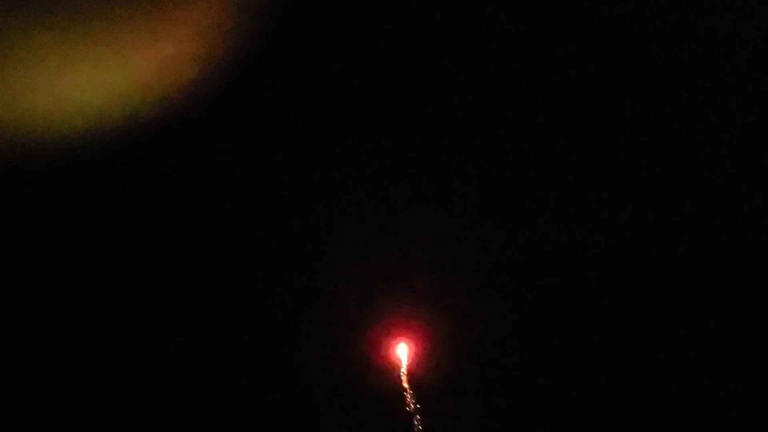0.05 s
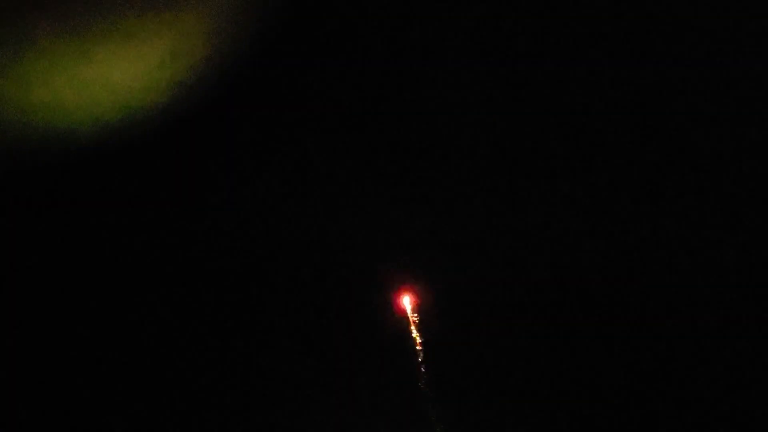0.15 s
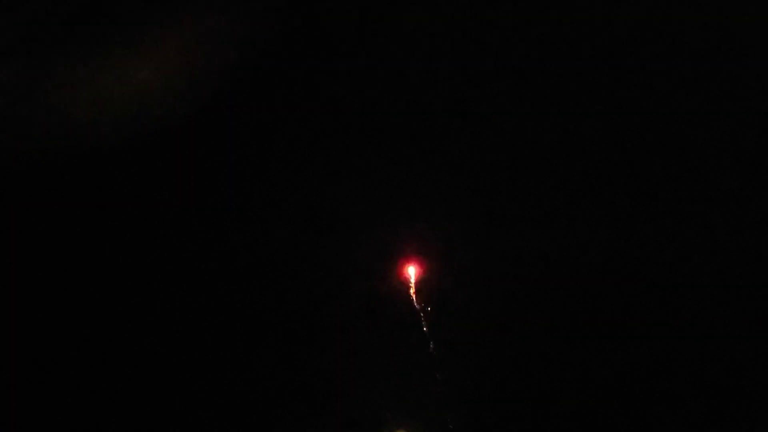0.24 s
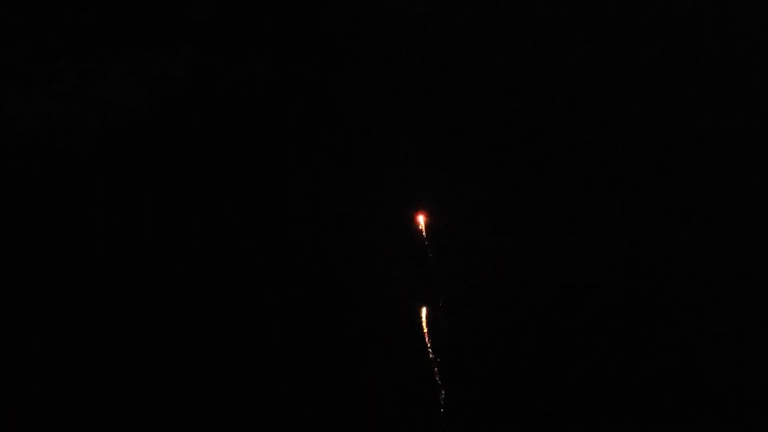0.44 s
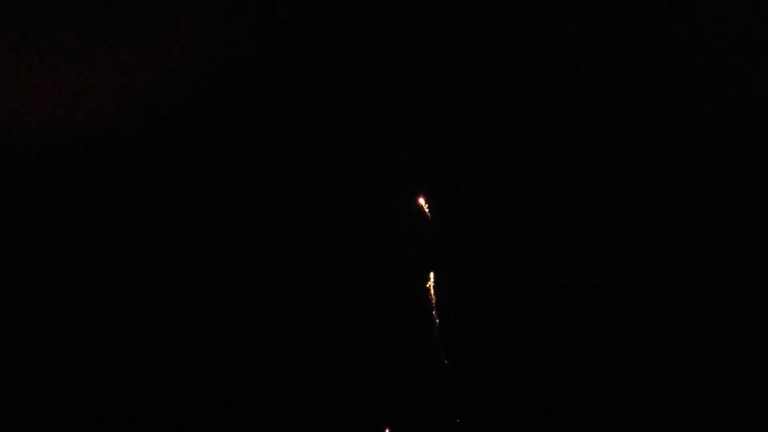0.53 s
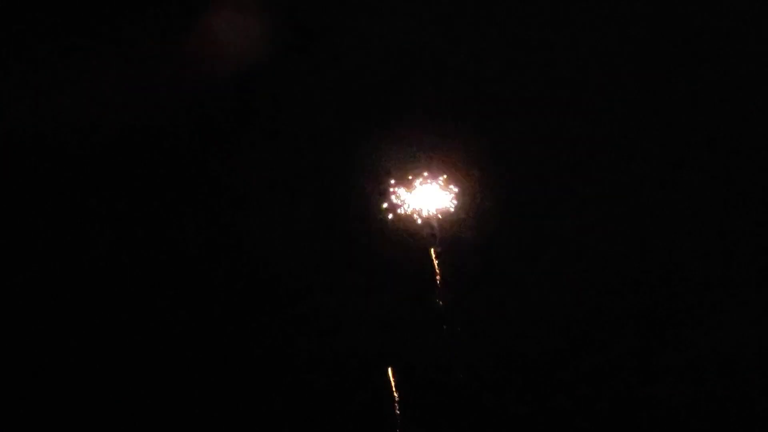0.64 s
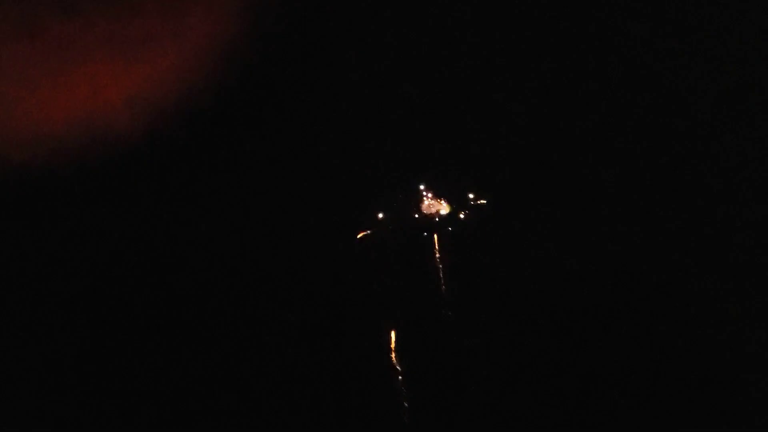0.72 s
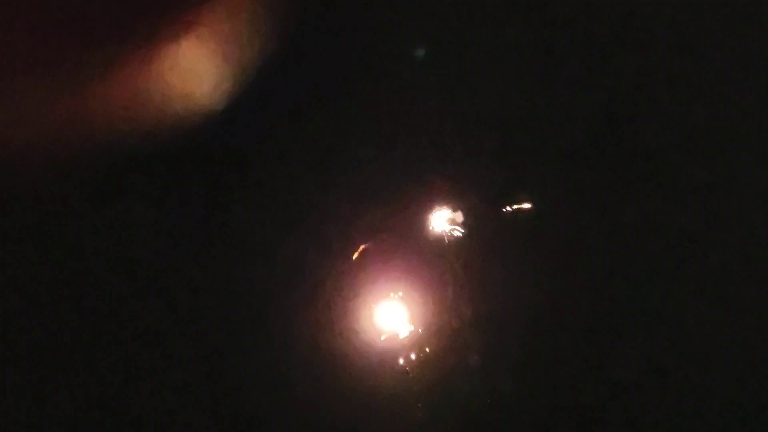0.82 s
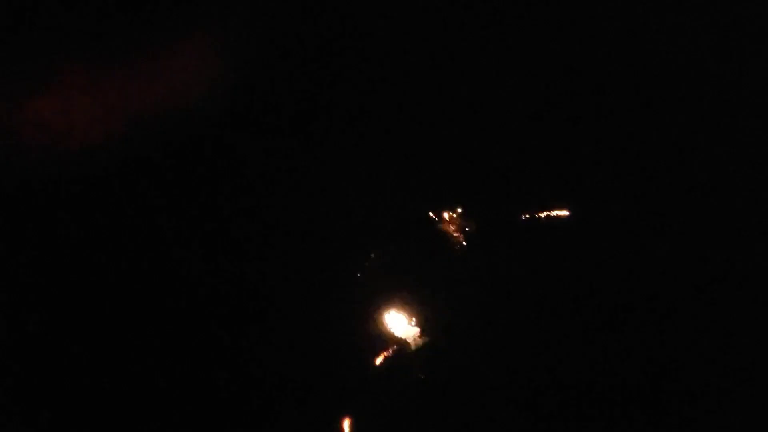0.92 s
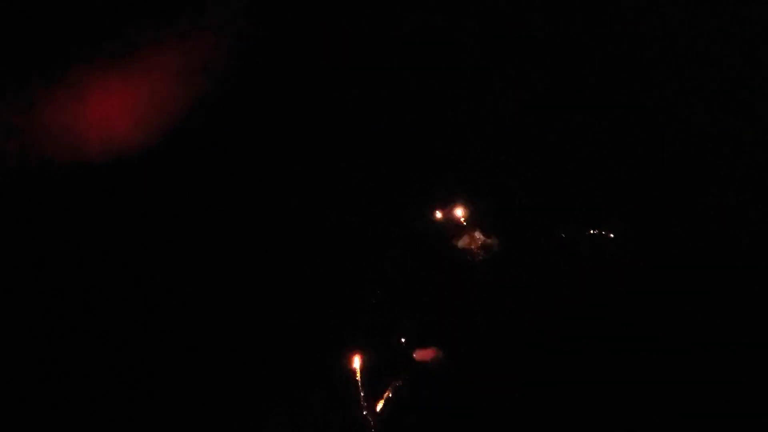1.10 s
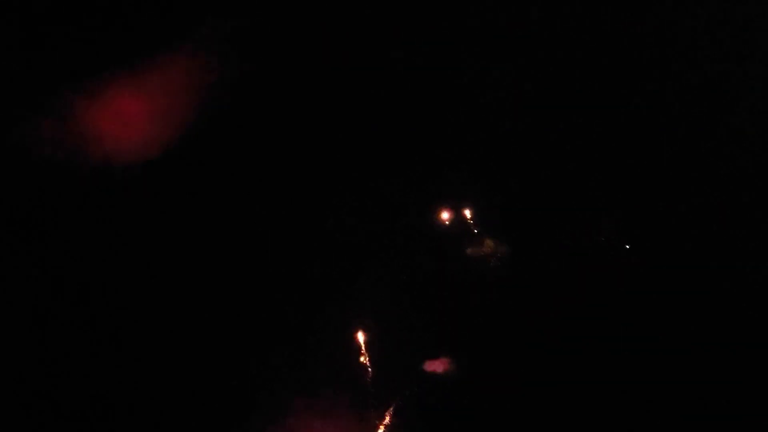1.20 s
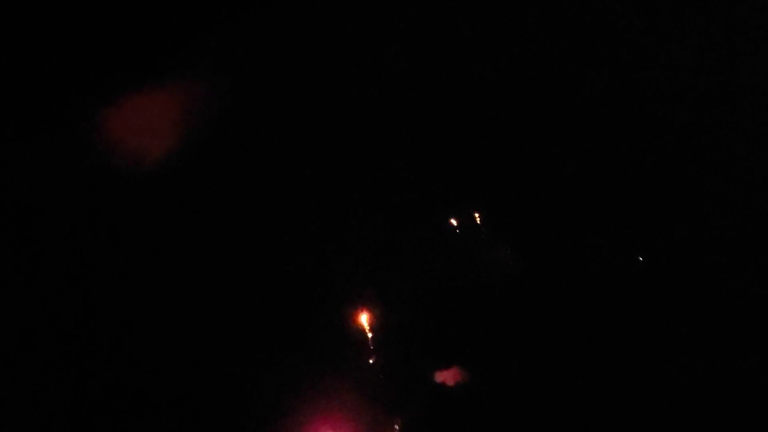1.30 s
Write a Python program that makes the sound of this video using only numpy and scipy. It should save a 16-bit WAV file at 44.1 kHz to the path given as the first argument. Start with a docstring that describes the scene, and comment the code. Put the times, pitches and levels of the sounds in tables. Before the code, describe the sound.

Fireworks outdoors at night: punchy launch thumps, then a quick cluster of loud cracking shell bursts

```python
"""A lift charge is heard already under way: a firework cake thumps at a nearly even pace, outdoors at night.
Each thump is a short push of air with a low boom. Three shells burst overhead, the last launch among them;
each crack is a sharp shock wave, doubled by its bounce off the ground. Nearby things scatter every bang,
a facade slaps it back, and noise-made echoes and rumble roll on; the microphones overload on the peaks."""
import sys
import numpy as np
from scipy import signal
from scipy.fft import rfft, irfft
from scipy.io import wavfile

SR = 44100
rng = np.random.default_rng(int(sys.argv[2]) if len(sys.argv) > 2 else 0)


def inscribe(sig):
    """Save sig as 16-bit PCM at rate SR to the path in sys.argv[1].

    A 1-D sig is mono; a 2-D sig holds one channel per row.
    Samples are clipped to [-1, 1] before scaling.
    """
    pcm = np.round(np.clip(np.atleast_2d(sig).T, -1, 1) * 32767)
    wavfile.write(sys.argv[1], SR, pcm.astype(np.int16))


N = 59535
T = np.arange(N) / SR  # time in seconds
HZ = np.fft.rfftfreq(2 * N, 1 / SR)

# How alike left and right are for nearby scatter: pitch_hz, likeness (1 = the same)
NEAR_LIKENESS = [(30, 0.59), (400, 0.59), (1000, 0.47), (2000, 0), (4000, 0), (16000, 0)]
# How alike left and right are for far sounds: pitch_hz, likeness (1 = the same)
FAR_LIKENESS = [(30, 0.36), (130, 0.16), (400, 0.079), (1000, 0.2), (2500, 0.19), (16000, 0)]
# Tone of a reflection off the facade or another dull surface: pitch_hz, level_db
DULL_REFLECTION = [(20, -29), (250, -7.5), (430, 1), (620, 5), (1000, -4.5), (1700, -8.5), (2800, -13.5),
                   (7000, -14.5), (16000, -12)]

COMMON_FRONT_S = 0.00006  # front rise time of the bangs that feed most reflections


def amp(db):
    """Turns decibels into a gain."""
    return 10 ** (np.asarray(db) / 20)


def read(points, hz):
    """Reads a table at the given pitches, on a log-frequency axis."""
    table_hz, value = np.transpose(points)
    return np.interp(np.log(hz + 1), np.log(table_hz + 1), value)


def evened(x):
    """Scales a sound to an rms (average strength) of 1."""
    return x / np.sqrt(np.mean(x ** 2) + 1e-20)


def add(mix, start_s, sound):
    """Mixes in a sound at its start time; whatever falls outside the mix is cut off."""
    at = int(round(start_s * SR))
    sound = sound[..., max(-at, 0):]
    part = mix[:, max(at, 0):][:, :sound.shape[-1]]
    part += sound[..., :part.shape[-1]]


def colour(x, points, size=4096):
    """Filters a sound to the tone in a table, with nothing sounding before its cause (minimum phase)."""
    log_gain = np.log(amp(read(points, abs(np.fft.fftfreq(size, 1 / SR)))))
    spectrum = np.exp(np.conj(signal.hilbert(log_gain)))
    taps = np.fft.ifft(spectrum).real[:size // 2]
    return signal.fftconvolve(x, taps[None], axes=1)[:, :x.shape[1]]


def noise_pair(likeness):
    """Makes spectra of left and right noise that share as much as the table says."""
    left, other = rfft(rng.standard_normal((2, 2 * N)))
    shared = np.clip(read(likeness, HZ), -1, 1)
    return np.array([left, shared * left + np.sqrt(1 - shared ** 2) * other])


def tail(likeness, rise_s, t60, spectrum):
    """Builds a cloud of reflections from noise; each band takes its t60 in seconds to fall 60 dB."""
    # A random level every 32 samples, spread by 1.5 dB, makes the cloud uneven
    grain = amp(1.5 * np.repeat(rng.standard_normal(N // 32 + 1), 32)[:N])
    noise = evened(irfft(noise_pair(likeness))[:, :N] * grain)
    hz, t, bands = signal.stft(noise, SR, nperseg=256)
    fading = bands * amp(-60 * t / read(t60, hz)[:, None])
    cloud = signal.istft(fading, SR, nperseg=256)[1][:, :N]
    cloud = cloud * (1 - np.exp(-T / rise_s))
    # Energy is about 1 before the tone is applied
    return colour(evened(cloud) / np.sqrt(N), spectrum)


def through(pulse, cloud):
    """Repeats the left channel of a pulse at every reflection in a cloud."""
    return signal.fftconvolve(pulse[:1], cloud, axes=1)[:, :N]


def front(t, rise_s):
    """Makes a pressure step that takes a short time to rise."""
    return .5 + .5 * np.tanh(2 * t / rise_s - 2)


def port_times(lag_s, size=2048):
    """Gives the time at each microphone; with a positive lag the left hears first."""
    return T[:size] - np.array([[max(-lag_s, 0)], [max(lag_s, 0)]])


def launch(db, push_s, rise_s, scatter_db, boom_db, facade_db):
    """Fires a lift charge: a blast, a few bounces, close and wider scatter, and a low boom."""
    # Tone of the blast: pitch_hz, level_db
    launch_tone = [(20, 4), (100, -11.5), (400, -3.5), (700, -2.5), (1500, -2), (2100, -8), (2600, -11.5),
                   (3600, -2.5), (4800, -2.5), (6800, 4), (8300, -4), (10000, -1.5), (16000, -13.5)]
    # Single reflections: delay_s, level_db, front_rise_s
    launch_bounces = [(.0027, -8, 0.00024), (0.0122, -18.5, .0004), (.042, -28.5, 0.00001)]
    # Tone of scatter from right beside the microphones: pitch_hz, level_db
    close_tone = [(20, -13), (1000, -3), (2600, 1), (4500, 5), (10000, 9), (16000, -4)]
    # Tone of scatter from nearby things: pitch_hz, level_db
    launch_scatter_tone = [(20, -24), (60, 23.5), (130, 11), (220, 7.5), (380, 7.5), (700, 4), (1200, -5.5),
                           (2100, 12), (2900, 3), (6500, -4.5), (8500, -5), (16000, 26)]
    # Time for that scatter to fall 60 dB: pitch_hz, t60_s
    launch_decay = [(60, 0.27), (300, .14), (1000, 0.14), (4000, 0.11), (16000, 0.082)]
    lag_s, close_db, close_t60_s = .00009, -20.5, 0.018
    pulse = blast(push_s, rise_s, lag_s, launch_tone)
    reflected = blast(push_s, COMMON_FRONT_S, lag_s, launch_tone)
    out = surroundings(reflected, .0542, facade_db) + amp(boom_db) * boom()
    add(out, 0, pulse)
    for delay_s, bounce_db, bounce_rise_s in launch_bounces:
        add(out, delay_s, amp(bounce_db) * blast(push_s, bounce_rise_s, lag_s, launch_tone))
    close = tail(NEAR_LIKENESS, COMMON_FRONT_S, [(1, close_t60_s)], close_tone)
    add(out, 0, amp(close_db) * through(pulse, close))
    scatter = tail(NEAR_LIKENESS, 0.00067, launch_decay, launch_scatter_tone)
    add(out, 0, amp(scatter_db) * through(reflected, scatter))
    return amp(db) * out


def blast(push_s, rise_s, lag_s, spectrum):
    """Makes a short push of air, followed by a longer, weaker suck."""
    mic_low_hz = 106  # the bass below this is thinned out
    t = port_times(lag_s)
    u = np.maximum(t - rise_s, 0) / push_s
    wave = 2 * front(t, rise_s) * (1 - u) * np.exp(-u)
    high_pass = signal.butter(1, mic_low_hz, "high", fs=SR)
    return colour(signal.lfilter(*high_pass, wave), spectrum)


def boom():
    """Makes the low swell after a lift charge: two deep tones that rise and fade together."""
    peak_s, main_hz, low_hz, low_db = .011, 127.6, 53.7, -9
    u = T / peak_s
    wave = np.sin(2 * np.pi * main_hz * T) + amp(low_db) * np.sin(2 * np.pi * low_hz * T)
    return wave * (u * np.exp(1 - u)) ** 2


def burst(db, length_s, rise_s, ground_s, ground_db, ground_push_s, scatter_db, facade_db):
    """Bursts a shell overhead: a shock, its ground bounce, then scatter from things on the ground."""
    # Tone of the ground bounce: pitch_hz, level_db
    ground_tone = [(20, 6), (200, -13), (500, 0), (1200, 3), (2000, 8), (2900, -1.5), (4200, 6.5),
                   (6600, 4.5), (8300, 3), (12000, -8.5), (16000, -21)]
    # Dull single reflections: delay_s, level_db
    burst_bounces = [(.0029, -16), (0.021, -15.5)]
    # Tone of the scatter: pitch_hz, level_db
    burst_scatter_tone = [(20, 7), (130, -9), (400, -2.5), (700, -9), (1200, -9.5), (2100, -9), (2900, -5),
                          (4200, -5), (6500, -5.5), (8500, -5.5), (16000, 28)]
    # Time for the ground scatter to fall 60 dB: pitch_hz, t60_s
    burst_decay = [(60, 0.18), (300, 0.15), (1000, 0.24), (4000, 0.12), (16000, 0.14)]
    sky_db, sky_rise_s, sky_t60_s = -7, 0.00067, 0.012
    pulse = shock(length_s, rise_s)
    # The right microphone hears the bounce first
    bounce = blast(ground_push_s, COMMON_FRONT_S, -0.00012, ground_tone)
    out = surroundings(bounce, .049, facade_db)
    add(out, 0, pulse)
    for delay_s, bounce_db in burst_bounces:
        add(out, delay_s, amp(bounce_db) * colour(pulse, DULL_REFLECTION))
    sky_scatter = tail(NEAR_LIKENESS, sky_rise_s, [(1, sky_t60_s)], burst_scatter_tone)
    add(out, 0, amp(sky_db) * through(pulse, sky_scatter))
    add(out, ground_s, amp(ground_db) * bounce)
    ground_scatter = tail(NEAR_LIKENESS, 0.0017, burst_decay, burst_scatter_tone)
    add(out, ground_s, amp(scatter_db) * through(bounce, ground_scatter))
    return amp(db) * out


def shock(length_s, rise_s):
    """Makes an N-shaped shock: pressure jumps up, falls straight through zero, and jumps back."""
    # Tone of the shock: pitch_hz, level_db
    shock_tone = [(20, -16), (200, -10.5), (500, -2), (900, -6), (2000, 0.5), (2900, -13), (4200, -6),
                  (6600, -0.5), (8300, -8), (12000, -4.5), (16000, -17.5)]
    t = port_times(.00003)  # the left microphone hears first
    gate = front(t, rise_s) - front(t - length_s, rise_s)
    wave = gate * (1 - 2 * (t - rise_s) / length_s)
    return colour(2 * wave, shock_tone)


def surroundings(pulse, facade_s, facade_db):
    """Adds the dull stepped slap from the facade and the long faint ring of the open air."""
    # Tone of the open-air ring: pitch_hz, level_db
    air_tone = [(20, -28), (300, 12), (900, -4), (2000, -5.5), (4000, -6), (8000, -6.5), (16000, 23.5)]
    # Time for the ring to fall 60 dB: pitch_hz, t60_s
    air_decay = [(60, 0.6), (500, 0.86), (2000, 1.07), (16000, 0.9)]
    # Faces of the stepped facade: extra_delay_s, level_db
    facade_steps = [(0, 0), (.0027, -1), (.0049, -8), (.0083, -7)]
    # How alike left and right are in the facade blur: pitch_hz, likeness (1 = the same)
    facade_likeness = [(30, 1), (700, 1), (2000, 0.98), (16000, 0)]
    air_db, air_rise_s = -19, 0.01
    blur_db, blur_rise_s, blur_t60_s = -6, .002, .07
    out = amp(air_db) * through(pulse, tail(FAR_LIKENESS, air_rise_s, air_decay, air_tone))
    slap = amp(facade_db) * colour(pulse, DULL_REFLECTION)
    for delay_s, step_db in facade_steps:
        add(out, facade_s + delay_s, amp(step_db) * slap)
    blur = tail(facade_likeness, blur_rise_s, [(1, blur_t60_s)], DULL_REFLECTION)
    add(out, facade_s, amp(facade_db + blur_db) * through(pulse, blur))
    return out


def far_echo(db, length_s, centre_hz):
    """Returns a bang from far away as a dull, smeared bump of noise around one pitch."""
    width_octaves = 0.57
    band = np.exp(-.5 * (np.log2((HZ + 1) / centre_hz) / width_octaves) ** 2)
    t = T[T < length_s]
    noise = irfft(noise_pair(FAR_LIKENESS) * band)[:, :len(t)]
    swell = np.sin(np.pi * (t / length_s) ** 0.62)  # the power makes it peak early
    return amp(db) * evened(noise * swell)


def roll():
    """Rolls earlier shots around the neighbourhood: noise whose level and treble rise and fall."""
    # Course of the rumble: time_s, level_db, treble_against_rest_db
    roll_course = [(0, -38, -0.5), (0.201, -43, 1.5), (.45, -42.5, -2), (.68, -47.5, 2), (0.849, -45.5, 5),
                   (1.05, -48.5, -7), (1.2, -51.5, -1.5), (1.35, -43, -1)]
    # Tone of the rumble: pitch_hz, level_db
    roll_tone = [(20, -16), (60, 2.5), (90, -2.5), (130, 6), (210, -6.5), (380, -1), (700, -16),
                 (1900, -23), (2900, -37), (6500, -34), (8500, -41.5), (15500, -43)]
    treble_hz = 1210
    wash = noise_pair(FAR_LIKENESS) * amp(read(roll_tone, HZ))
    treble_share = 1 / (1 + (treble_hz / (HZ + 1)) ** 2)
    whole = irfft(wash)[:, :N]
    treble = irfft(wash * treble_share)[:, :N]
    time_s, level_db, treble_db = np.transpose(roll_course)
    shaded = whole + treble * (amp(np.interp(T, time_s, treble_db)) - 1)
    return shaded / whole.std() * amp(np.interp(T, time_s, level_db))


def scene():
    """Sets the launches, bursts and far echoes into the rolling rumble."""
    # Lift charges: start_s (negative = already under way), level_db, push_s, front_rise_s,
    # scatter_db, boom_db, facade_db
    launches = [(-.024, 1, 0.00032, 0.000093, -6.5, -42, -15),
                (0.2214, -0.5, 0.00039, 0.000079, -7, -24.5, -16.5),
                (0.4959, 0.5, 0.00046, 0.000032, -10.5, -30, -17.5),
                (0.7729, 2, 0.00037, 0.000064, -16.5, -43, -33)]
    # Shell bursts: start_s, level_db, shock_length_s, front_rise_s, ground_delay_s, ground_db,
    # ground_push_s, scatter_db, facade_db
    bursts = [(0.7115, 0, .00103, 0.000032, .0105, -2.5, 0.00074, -1.5, -13),
              (0.8498, 0, 0.00059, 0.000057, .00955, -0.5, 0.00019, -5, -14),
              (0.9249, -2, 0.000453, 0.000057, .01025, 0.5, 0.00024, -9, -18)]
    # Far echoes: start_s, level_db, length_s, centre_hz
    far_echoes = [(.07, -39, 0.027, 116), (.14, -45.5, 0.031, 125), (0.167, -40.5, .04, 315),
                  (.281, -30.5, 0.018, 393), (.288, -36, 0.03, 107), (0.364, -41.5, .03, 130),
                  (0.407, -45.5, 0.069, 340), (.583, -46, 0.022, 350), (.588, -38.5, 0.02, 115),
                  (.645, -39.5, 0.061, 100), (.655, -44, 0.031, 366), (1.115, -43, 0.024, 124),
                  (1.122, -49.5, 0.037, 464), (1.201, -47.5, 0.033, 316), (1.242, -43, 0.076, 328.6)]
    mix = roll()
    for source, table in (launch, launches), (burst, bursts), (far_echo, far_echoes):
        for start_s, *settings in table:
            add(mix, start_s, source(*settings))
    return mix


def record(dry):
    """Colours the right microphone, rounds off peaks as both overload, then removes the highest treble."""
    # Right microphone against the left: pitch_hz, level_db
    right_tone = [(20, 0), (60, -2), (130, 0), (300, 1.7), (600, .8), (1100, -.3), (2200, -1.6),
                  (5000, -.5), (9000, 0), (14000, 2.5)]
    ceiling, knee, edge_hz = .98, 5, 16300  # a higher knee bends more sharply
    heard = np.vstack([dry[:1], colour(dry[1:], right_tone)])
    limited = heard / (1 + abs(heard / ceiling) ** knee) ** (1 / knee)
    low_pass = signal.firwin(255, edge_hz, window=("kaiser", 9), fs=SR)
    return signal.oaconvolve(limited, low_pass[None], "same")


dry = scene()
out = record(dry)
inscribe(out)
```